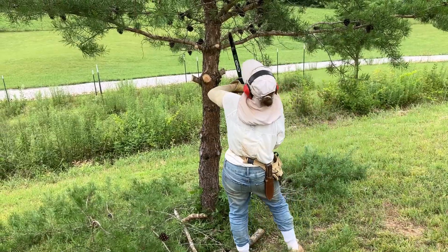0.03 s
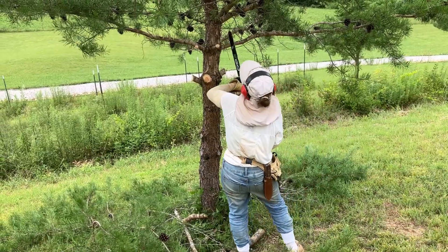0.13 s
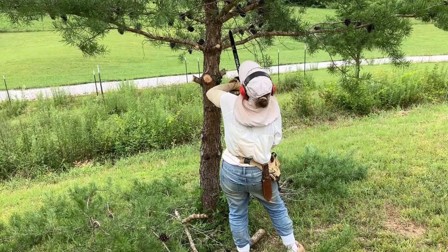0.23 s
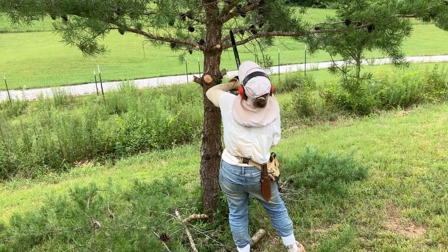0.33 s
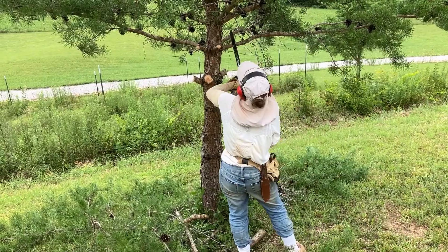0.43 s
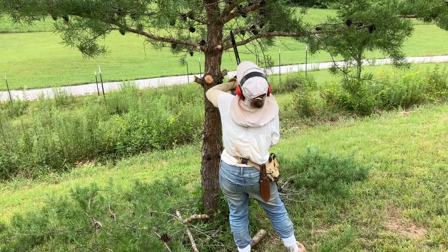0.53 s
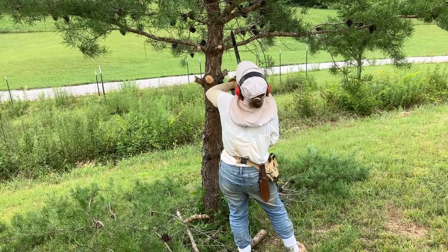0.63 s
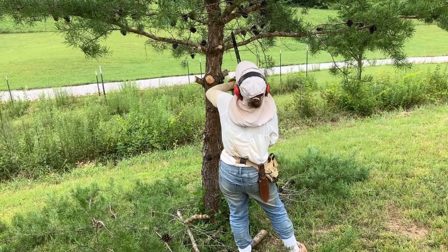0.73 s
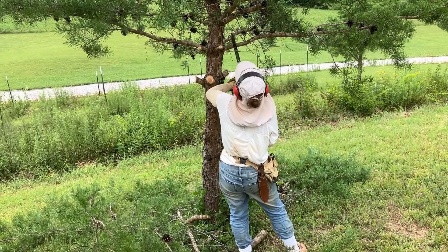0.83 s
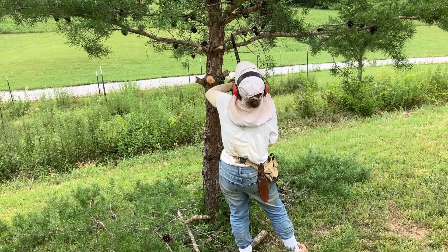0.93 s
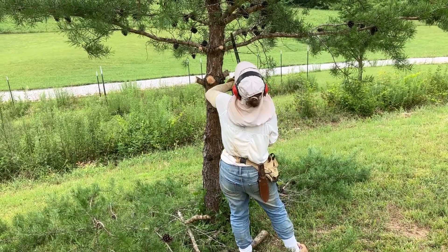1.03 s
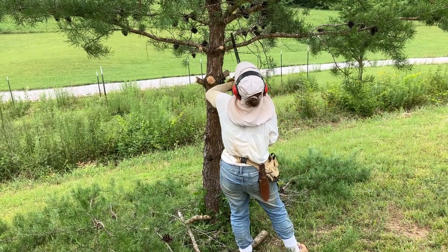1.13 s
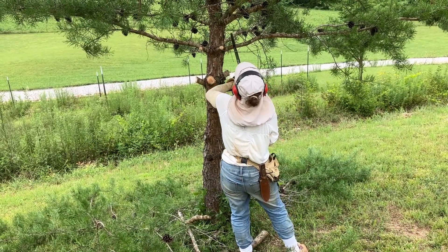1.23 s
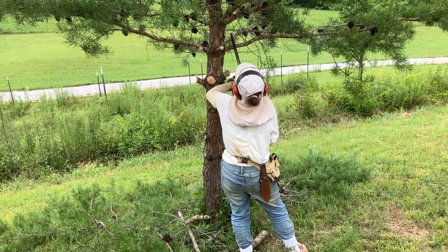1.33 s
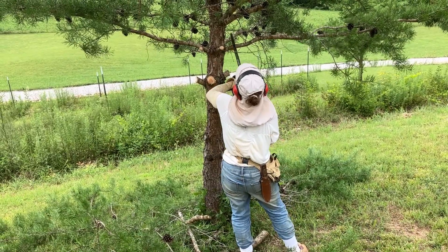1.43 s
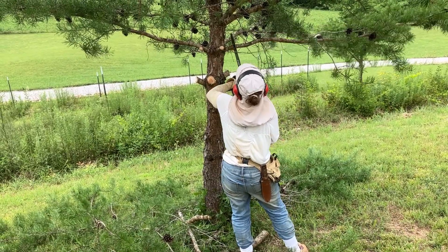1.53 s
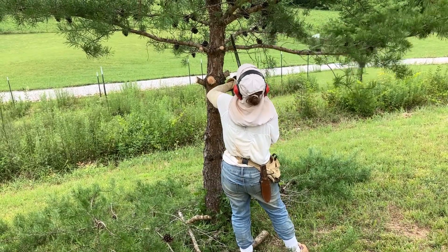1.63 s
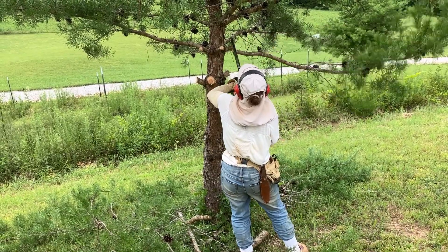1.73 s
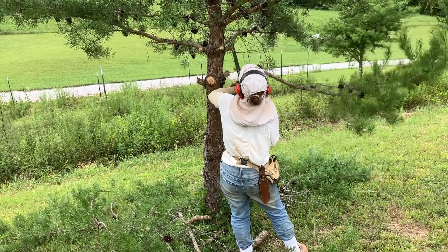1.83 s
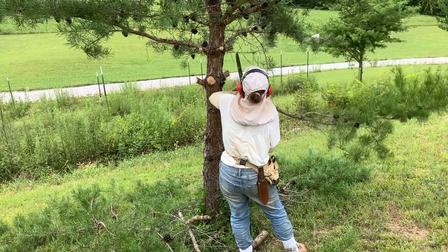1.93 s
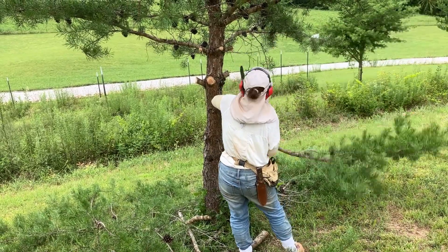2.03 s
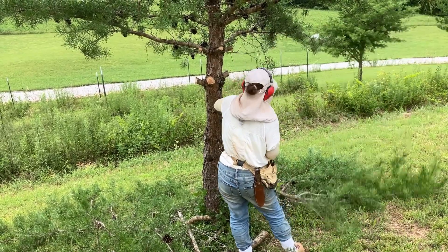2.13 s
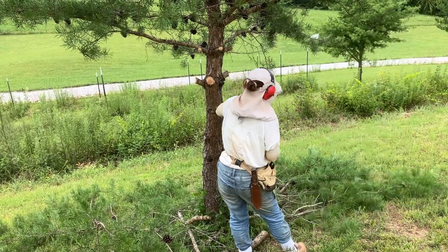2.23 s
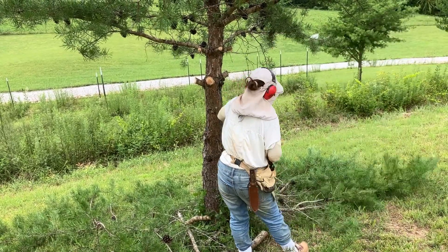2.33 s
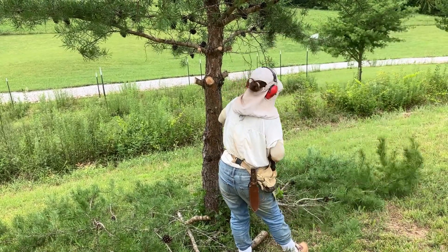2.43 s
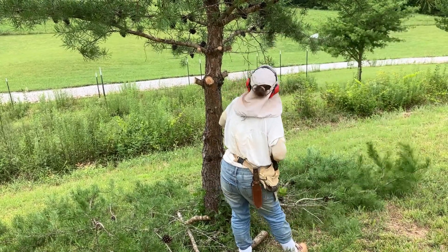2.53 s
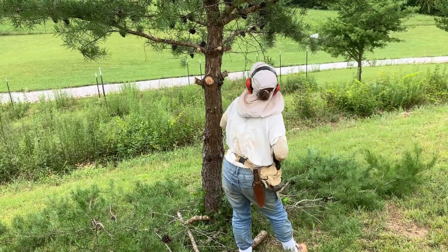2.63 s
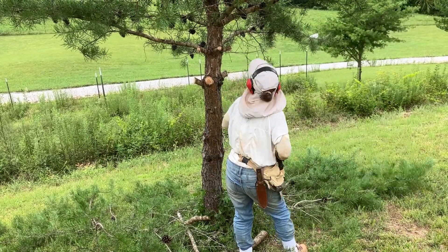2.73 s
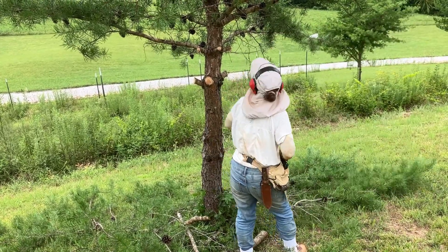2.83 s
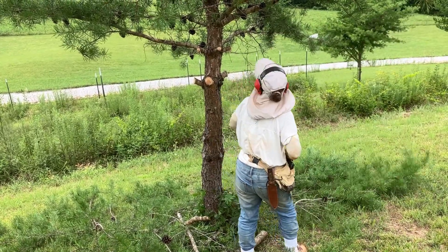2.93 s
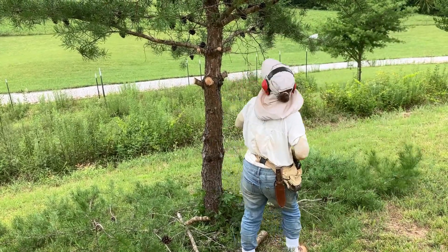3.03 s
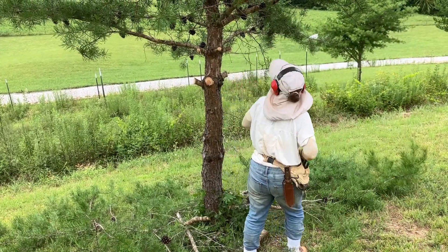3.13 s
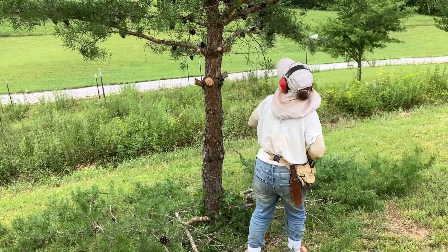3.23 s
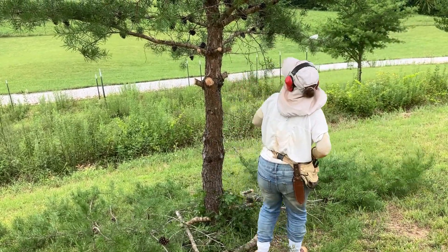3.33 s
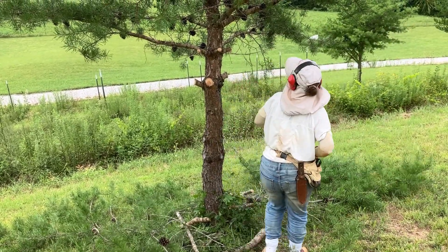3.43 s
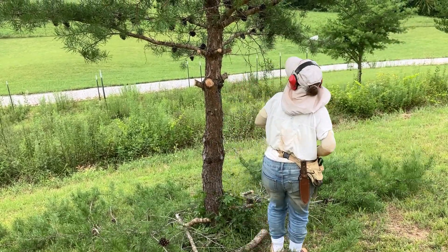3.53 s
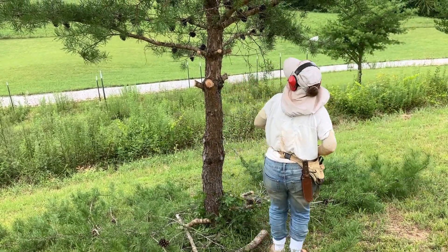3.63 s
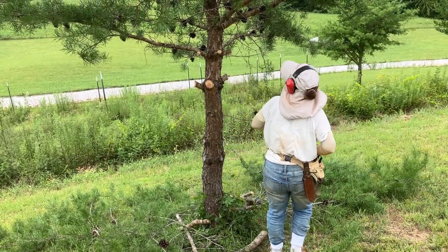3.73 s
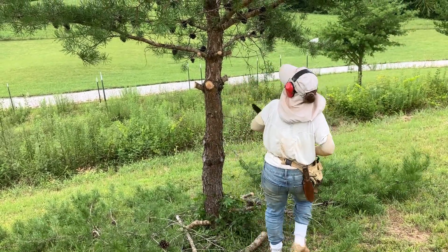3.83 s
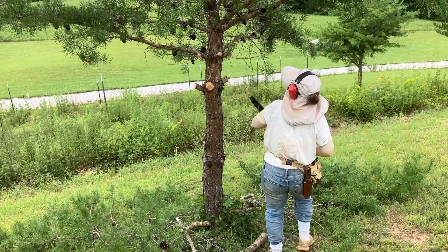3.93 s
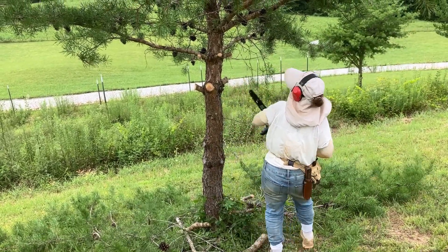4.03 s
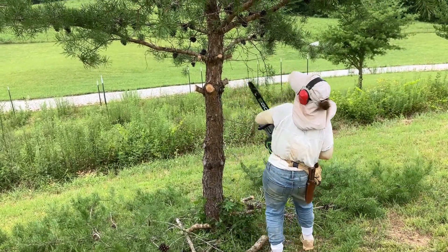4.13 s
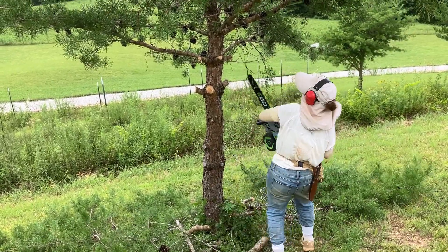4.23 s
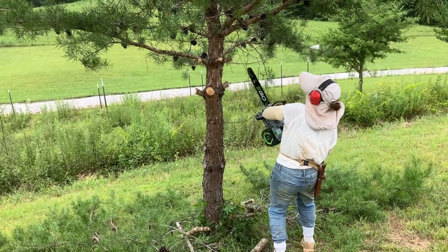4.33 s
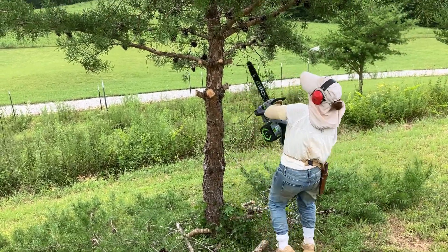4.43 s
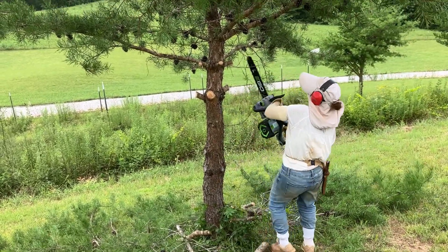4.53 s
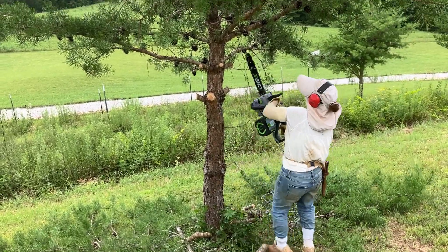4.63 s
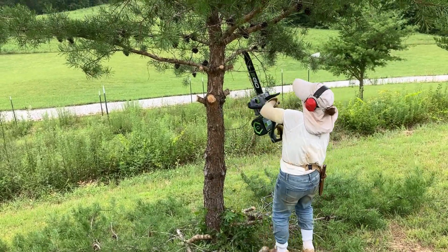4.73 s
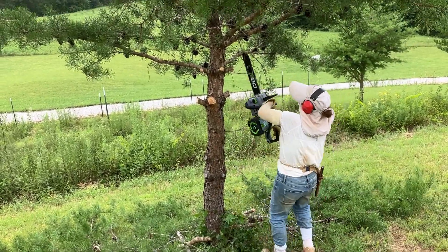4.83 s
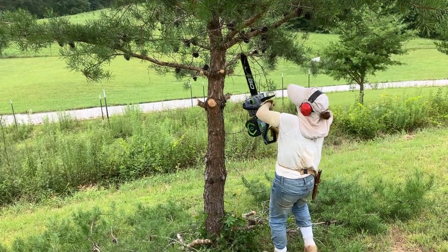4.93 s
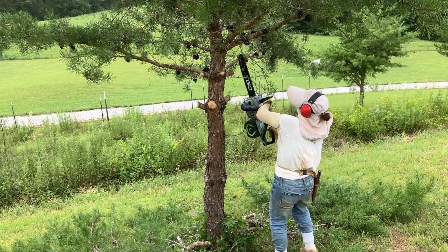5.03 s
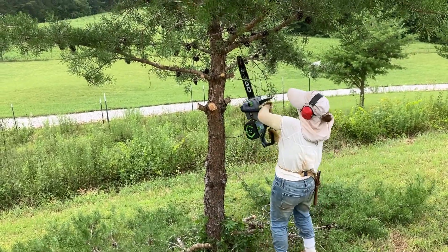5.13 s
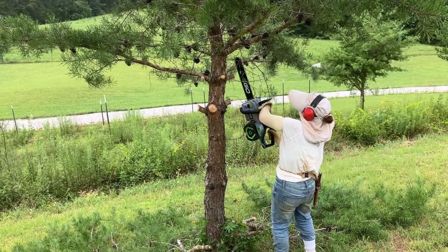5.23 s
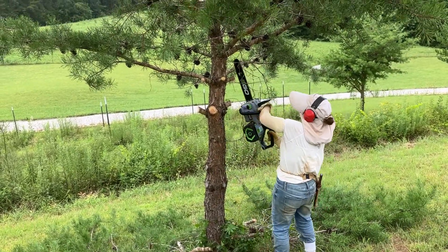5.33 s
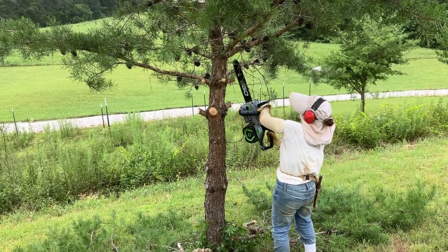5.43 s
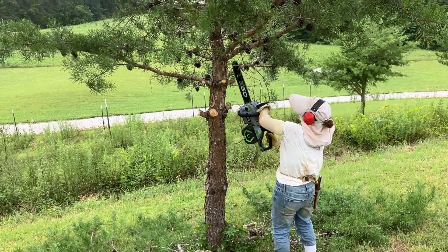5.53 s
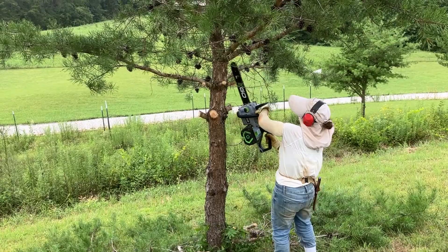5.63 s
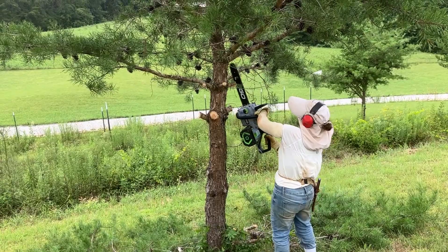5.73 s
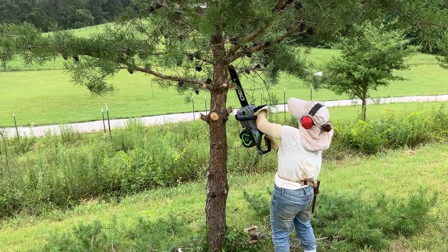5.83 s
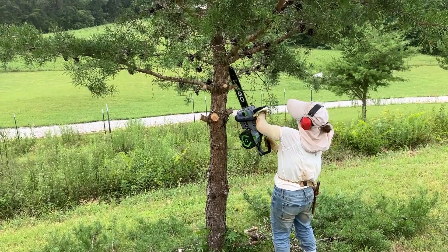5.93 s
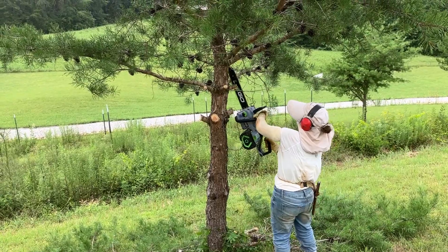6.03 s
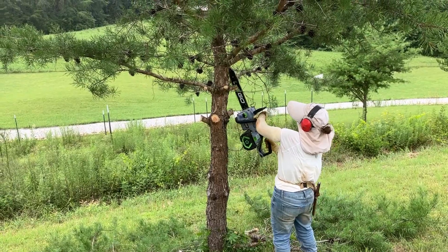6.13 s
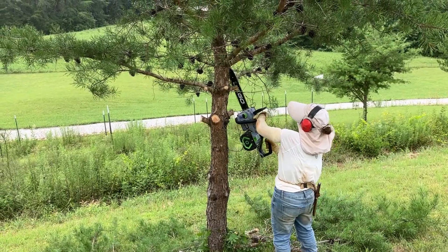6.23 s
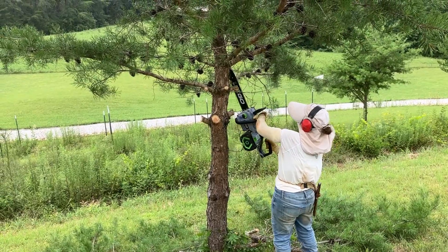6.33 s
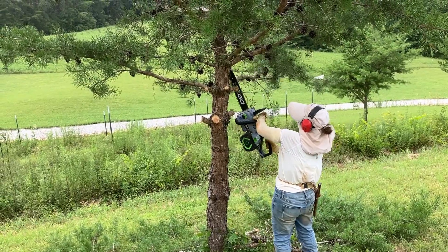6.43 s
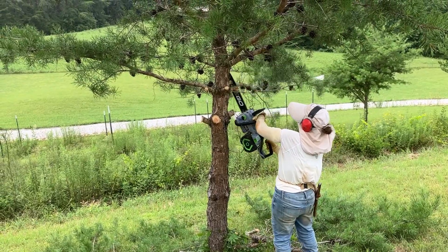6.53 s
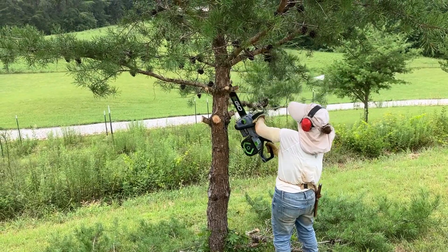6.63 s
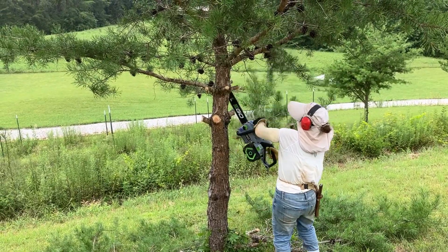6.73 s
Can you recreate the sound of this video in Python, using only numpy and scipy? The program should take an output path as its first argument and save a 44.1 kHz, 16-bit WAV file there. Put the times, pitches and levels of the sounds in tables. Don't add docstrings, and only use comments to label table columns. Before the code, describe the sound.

Outdoors, an electric chainsaw buzzes and rattles, wood splits, the branch drops with a swish and thump, and the saw revs into another cut.

```python
import sys
import numpy as np
from scipy import signal
from scipy.fft import rfft, irfft, next_fast_len
from scipy.io import wavfile
from scipy.ndimage import uniform_filter1d

SR = 44100
rng = np.random.default_rng(int(sys.argv[2]) if len(sys.argv) > 2 else 0)


def inscribe(sig):
    pcm = np.round(np.clip(np.atleast_2d(sig).T, -1, 1) * 32767)
    wavfile.write(sys.argv[1], SR, pcm.astype(np.int16))


def linear_from_db(decibels):
    return 10 ** (np.asarray(decibels, float) / 20)


N = 298998

# frequency in Hz, level in dB per Hz.
GUST = [(22, -29.5), (45, -1.5), (75, 0), (110, -3), (180, -12.5), (350, -32), (700, -47)]
# peak in seconds, length in seconds, level in dB.
PUFFS = [(0.022, .03, -59), (.2, 0.054, -54), (.31, .05, -51), (.5, 0.046, -50), (0.721, .04, -54),
         (.84, 0.063, -52), (0.964, 0.029, -53), (1.13, 0.11, -50), (1.71, 0.042, -53), (1.885, 0.09, -48),
         (2.048, 0.076, -56), (2.171, 0.044, -56), (2.268, 0.036, -52), (2.387, 0.075, -50),
         (2.523, 0.053, -35.5), (2.64, 0.059, -48), (2.72, 0.075, -49), (2.873, 0.056, -50.5),
         (3.08, 0.1, -58.5), (3.384, 0.068, -51), (3.47, 0.06, -47), (3.59, 0.087, -58),
         (3.981, 0.058, -52.5), (4.178, 0.044, -58), (4.42, .05, -64), (4.731, 0.043, -53),
         (4.93, 0.075, -54), (5.318, .03, -60), (5.571, 0.052, -48), (5.66, 0.049, -56), (5.84, 0.038, -49),
         (5.981, 0.062, -47), (6.08, 0.029, -58), (6.444, .04, -61), (6.6, .05, -48), (6.751, 0.051, -45)]
# frequency in Hz, level in dB per Hz.
AIR = [(150, -4.5), (290, 5), (450, -7.5), (700, -2.5), (950, -12), (1400, -25), (3000, -40.5), (7700, -23),
       (8350, -9), (9000, -22.5), (15500, -26)]

# frequency in Hz, level in dB per Hz.
NEEDLES = [(400, 1), (700, -7), (1500, -4), (2500, -1.5), (6500, 3.5), (8300, 6.5), (15500, -0.5)]
# peak in seconds, length in
# seconds, bright part in dB, low part over it in dB.
BRUSHES = [(2.238, 0.017, -47, -11), (2.275, 0.034, -37.5, -13), (2.323, 0.039, -45, -5),
           (2.37, 0.037, -56.5, -3), (2.449, 0.079, -70, -11), (2.601, 0.063, -65, -4),
           (2.785, 0.14, -66.5, -24), (3.007, 0.068, -75.5, -10), (3.283, 0.076, -64.5, -3),
           (3.412, 0.067, -62.5, -12), (3.54, 0.042, -66, 2), (3.64, 0.025, -66, .3),
           (3.844, 0.081, -65.5, -4), (4.052, 0.065, -95, -0.5), (4.222, 0.069, -75, 8),
           (4.328, 0.037, -89, 9), (4.471, 0.13, -70.5, 1.5), (4.709, 0.013, -57, 9), (4.74, .015, -44, -4)]
# start in seconds, peak in dB, pitch in Hz, length in seconds.
KNOCKS = [(2.274, -46, 138, 0.0098), (2.417, -42, 50, .012), (2.495, -27, 126, 0.0025),
          (2.505, -30, 54.8, 0.013), (2.526, -22.5, 66.3, 0.0036), (2.856, -44, 54.8, .01),
          (2.878, -35, 141.5, 0.0044), (3.042, -49, 79, 0.0077), (3.463, -34, 88, 0.0027),
          (3.568, -48, 87, 0.0049), (3.972, -48, 90.6, 0.0075), (4.411, -56.5, 78.5, .01)]
# start
# in seconds, peak in dB, ring in Hz, bright part # over it in dB.
SNAPS = [(1.095, -20, 900, -2), (1.4093, -18, 1102, 1), (1.5245, -20, 1300, 2), (1.603, -19, 1505, 5),
         (1.69, -17, 620, -8), (2.237, -52, 903, 9.5), (4.7015, -55, 1600, -3), (2.267, -44, 640, 6),
         (2.27, -35, 600, 4), (2.275, -35, 800, 4), (2.281, -47, 700, 8), (2.339, -41, 710, -8),
         (2.384, -57, 635, -12), (2.591, -34.5, 480, -40), (2.714, -58, 1910, -6), (2.822, -64, 3000, 17),
         (2.894, -50, 672, -15), (2.967, -59.5, 606, -2), (3.251, -60, 740, -14.5),
         (3.269, -61.5, 700, -17.5), (3.332, -42, 1030, 4), (3.409, -53, 1490, -14), (3.521, -48, 566, -3),
         (3.535, -51, 1800, 6), (3.567, -53.5, 452, 13), (3.5745, -55, 2500, 9), (3.624, -66, 640, 16),
         (3.6365, -44.5, 1100, 13), (3.82, -61, 657, -10), (3.999, -53, 696, -11.5),
         (4.185, -48.5, 1480, -6), (4.226, -61, 2500, 17), (4.329, -51, 1150, -14), (4.388, -58, 610, -18),
         (4.467, -48.5, 1200, 10), (4.536, -52, 1200, -10), (4.54, -48, 1900, -6)]

# peak in seconds, hold in seconds, level in dB, low Hz, high Hz.
SPLIT = (1.605, .185, -35.5, 3350, 4350)
# peak in seconds, hold in seconds, level in dB, low Hz, high Hz.
SING = (6.23, .38, -38, 11480, 11800)

# seconds after the pull, teeth per second.
RUN_UP = [(0, 60), (.09, 252), (.19, 427), (.24, 585), (.3, 703), (.45, 1050)]
# seconds after release, share of speed left (0-1).
BRAKE = [(0, 1), (.05, .93), (.085, .875), (.1, .78), (.12, .63), (.14, .51), (.17, .41), (.23, .27)]
# time in seconds, teeth per second.
SPEED_FIRST = [(0, 645), (.3, 651), (.55, 652), (1.05, 656), (1.36, 656), (1.62, 665), (1.82, 687),
               (1.9, 696), (2.0, 692)]
SPEED_SECOND = [(5.05, 792), (5.15, 793.4), (5.72, 793.8), (5.86, 811), (5.95, 819), (6.03, 823),
                (6.18, 834), (6.3, 828), (6.43, 839), (6.6, 852), (6.66, 862), (6.78, 866)]
# peak in seconds, build-up in seconds, strength (0-1), speed sag in Hz.
BITES_FIRST = [(.1, .04, 0.16, -1), (.2, 0.061, 0.2, 0.5), (.8, 0.093, 0.08, 0), (1.11, 0.027, 0.55, 15.5),
               (1.23, 0.058, 0.52, 5), (1.335, 0.046, 0.7, 9), (1.415, 0.015, 0.82, -0.5),
               (1.535, 0.052, 0.76, 9), (1.61, 0.035, 0.73, 0.5), (1.7, 0.048, 0.91, 23.5),
               (1.77, 0.034, 0.35, 1.5), (1.95, 0.13, 0.19, 0), (2.15, .03, 0.38, 0.5)]
BITES_SECOND = [(4.8, 0.061, 0.51, 0), (4.95, 0.038, 0.29, 1), (5.75, 0.062, 0.15, 0),
                (6.121, 0.0695, 0.39, 16.5), (6.39, 0.087, 0.26, 7), (6.596, .1, 0.43, 19),
                (6.78, 0.76, 0.22, 0)]
# level in dB, dB per octave of speed, dB at full bite, drift in dB per second.
LAYERS_FIRST = [
    (-25, 7.5, 1.5, 0.5),
    (-32.5, 4.5, 0.5, 0),
    (-36, -1.5, 7.5, 0.74),
    (-33.5, 18.5, -2.5, -1.35),
    (-4, 3.5, 0.8, 4),
    (-0.55, 9.5, -2, -2.5),
    (-9, 2.5, 4, 3.5),
    (-8, 2.2, -7, -2.9),
]
LAYERS_SECOND = [(-24, 9.4, -1, -0.13), (-31.5, 7.9, -0.5, 0.28), (-35, 3, 2, -0.43), (-36, 20, 5, 0.2),
                 (0.18, 7.2, -2.5, -1), (-3.5, 6.7, 4, -3.5), (-9.5, 7.7, 4.5, 0), (-14.5, 3.9, -4, 1.7)]
# frequency in Hz, width in Hz, level in dB.
HOUSING_FIRST = [(350, 130, -29), (554, 50, -30.5), (710, 48.3, -29), (832, 33, -23), (995, 32, -29),
                 (1282, 50, -27), (1384, 67, -29), (1705, 100, -32.5), (2103, 44, -26), (2547, 90, -33.5)]
HOUSING_SECOND = [(320, 71, -33.5), (566, 100, -35.5), (706, 58, -29.5), (802.6, 118, -20), (1039, 26, -36),
                  (1260, 68, -29.5), (1420, 95, -22), (1676, 36, -23), (2583, 43.03, -25),
                  (3172, 47, -26.5), (3458, 40, -20)]
# multiple of shaft speed, level in dB, dB per % of climb off the housing resonance.
ORDERS_FIRST = [(1, -30, 0), (2, -22, 2), (3, -7.5, 0), (4, -10, 0), (5, -5.5, 0), (7, -8, 0),
                (8, -14.5, 0), (9, -15, 0), (10, -13, 0), (11, -8.5, 0), (13, -14, 0), (15, -10, 0),
                (16, -18, 0), (17, -12, 0), (23, -15, 0), (30, -14, 0), (36, -18, 0), (37, -17, 0),
                (48, -16, 0), (51, -16, 0), (72, -9, 0), (97, -9, 0)]
ORDERS_SECOND = [(1, -30, .6), (2, -15, .8), (3, -15.5, -.5), (4, -6, 0), (5, -2, .3), (7, -4, -.6),
                 (8, -12, .2), (9, -9, 0), (10, -0.8, -1.5), (11, .5, -1), (13, -21, 2.4), (14, -15, -1),
                 (20, -11, 0), (23, -12, .3), (30, -15, 2.2), (34, -16, 0), (37, -2.5, -2.5), (39, -11, .4),
                 (42, -7, .6), (48, -19, 1.8), (56, -10, -.5), (60, -3, -2), (88, -12, .6), (90, -10, -.4)]
# frequency in Hz, level in dB per Hz.
CHAIN_FIRST = [(150, -24.5), (230, -12.5), (330, -5.5), (600, -0.5), (800, -7), (1300, -4.5), (1800, -8.5),
               (2500, -11.5), (3500, -13.5), (5000, -12), (6800, -4), (8300, 2), (11000, 6), (15500, 0.5)]
CHAIN_SECOND = [(150, -38), (230, -25), (330, -14), (600, -10.5), (800, -4), (1300, -6), (1800, -11),
                (2500, -8), (3500, -8), (5000, -8.5), (6800, -12.5), (8300, -8.5), (11000, -9),
                (15500, -10.5)]
# frequency in Hz, width in Hz, level in dB.
DIPS_FIRST = [(160, 60, -14), (432, 52, -21), (1050, 35, -7), (1520, 70, -16), (2090, 90, -14),
              (2780, 70, -13), (3200, 40, -8), (4700, 70, -10), (5600, 60, -7), (6250, 80, -8),
              (3760, 90, -15), (4310, 70, -18), (6700, 420, -10), (8450, 450, 4)]
DIPS_SECOND = [(170, 60, -14), (480, 40, -10), (940, 45, -9), (1100, 35, -8), (1410, 50, -7),
               (1535, 35, -11), (1670, 30, -11), (1790, 30, -4), (2160, 100, -16), (2860, 80, -13),
               (3400, 90, -15), (3800, 80, -18), (4350, 70, -13), (4770, 60, -12), (7000, 300, -5)]
# frequency in Hz, level in dB per Hz.
WOOD = [(60, -49.5), (150, -16.5), (250, -6), (600, -7.5), (1300, -2.5), (3000, -8), (6000, -10.5),
        (12000, -10.5)]
# dB in the run-up, dB under the brake.
STRAIN = [(0.1, -0.5), (-0.3, 7.5), (2.5, 0.5), (-0.8, -4)]
# seconds after the pull, low part in dB, bright part in dB.
JOLTS = [
    (.019, -33, -47.5),
    (.026, -33, -40.5),
    (.066, -35.5, -45.5),
    (0.093, -37, -47),
]
# peak in seconds, build-up in seconds, dB.
SURGES = [
    (.28, 0.022, 6),
    (1.15, 0.013, 3),
    (1.415, .015, 1.5),
    (1.53, .02, 1.5),
    (1.7, .02, 3.5),
    (6.06, .03, 1.5),
    (6.585, .035, 3.5),
    (6.77, .03, 3.5),
]
# time in seconds, left over right in dB.
BEARING = [(0, 0), (2.2, -0.3), (4.7, -0.1), (6.0, 0.5), (6.78, 1.2)]

# frequency in Hz, likeness (0-1).
SAME = [(60, 0.52), (300, 0.7), (1400, 0.84), (2600, 0.4), (6200, 0.78), (9150, 0.93), (11300, .85),
        (13600, 0.91)]
# frequency in Hz, lead of the left port in radians.
LEAD = [(250, 0), (750, .42), (1400, .1), (2100, .2), (2800, 1.4), (3300, .9), (4700, 1.9), (6200, 2.1),
        (6800, 0), (9150, -3.14), (11350, -6.28), (13600, -9.42), (15700, -12.5)]
# frequency in Hz, left over right in dB.
TILT = [(100, .1), (300, -.2), (650, .8), (820, 2.2), (1300, 3.2), (2500, 1.3), (5000, -.1)]

LET_GO_S = .03


def evened(x):
    return x / np.sqrt(np.mean(x ** 2) + 1e-20)


def read(points, hz):
    f, value = np.transpose(points)
    return np.interp(np.log(hz + 1), np.log(f + 1), value)


def coloured(x, points):
    size = next_fast_len(x.shape[-1])
    gain = linear_from_db(read(points, np.fft.rfftfreq(size, 1 / SR)))
    return evened(irfft(rfft(x, size) * gain, size)[..., :x.shape[-1]])


def band(x, lo_hz, hi_hz):
    return signal.sosfilt(signal.butter(3, [lo_hz, hi_hz], "band", fs=SR, output="sos"), x)


def wander(n, rate_hz):
    low_pass = signal.butter(2, rate_hz, fs=SR / 16)
    coarse = signal.lfilter(*low_pass, rng.standard_normal(n // 16 + 2))
    return np.interp(np.arange(n) / 16, np.arange(len(coarse)), evened(coarse))


def swell(t, s, rise, fall):
    return np.exp(-(np.maximum(s - t, 0) / rise) ** 2 - np.maximum(t - s, 0) / fall)


def ports(x):
    size = next_fast_len(x.shape[1])
    same = np.clip(read(SAME, np.fft.rfftfreq(size, 1 / SR)), 0, 1)
    a, b = rfft(x, size)
    second = same * a + np.sqrt(1 - same ** 2) * b
    return irfft(np.array([a, second]), size)[:, :x.shape[1]]


def add(mix, s, sound):
    part = mix[..., round(s * SR):][..., :sound.shape[-1]]
    part += sound[..., :part.shape[-1]]


def meadow():
    calm_db, puff_rise, air_db = -71, 0.91, -66
    n = next_fast_len(N)
    t = np.arange(0, n + 64, 64) / SR
    level = linear_from_db(calm_db)
    for s, length, db in PUFFS:
        width = np.where(t < s, puff_rise * length, length)
        level = level + linear_from_db(db) * np.exp(-((t - s) / width) ** 2)
    level = np.interp(np.arange(n) / SR, t, level)
    lumps = rng.standard_normal((2, n)) * linear_from_db(3.0 * wander(n, 12))
    wind = level * linear_from_db(-3.5) * coloured(lumps, GUST)
    hush = coloured(rng.standard_normal((2, n)), AIR) * linear_from_db(1.8 * wander(n, 7))
    return ports(wind + linear_from_db(air_db) * hush)[:, :N]


def trees(x):
    level_db, t60_s, delay_s = -46, 2.0, .28
    t = np.arange(2 * SR) / SR
    tail = band(rng.standard_normal((2, len(t))), 530, 1450) * linear_from_db(-60 * t / t60_s) * (t > delay_s)
    return linear_from_db(level_db) * signal.fftconvolve(x, tail / np.linalg.norm(tail[0]), axes=1)[:, :N]


def rustle():
    start, n = 2.2, int(2.6 * SR)
    floor_db, rise = -78.5, 0.58
    t = start + np.arange(n) / SR
    bright, low = linear_from_db(floor_db), linear_from_db(floor_db + 2.0)
    for s, length, db, low_db in BRUSHES:
        stroke = swell(t, s, rise * length, length)
        bright = bright + linear_from_db(db) * stroke
        low = low + linear_from_db(db + low_db) * stroke
    grains = rng.standard_normal((2, n)) * linear_from_db(2.8 * wander(n, 400) + 2.0 * wander(n, 30))
    grains = coloured(grains, NEEDLES)
    crisp = bright * evened(band(grains, 2400, 17000))
    body = low * linear_from_db(-3) * evened(band(grains, 400, 2400))
    return start, ports(crisp + body)


def knock(s, db, hz, length):
    t = np.arange(5000) / SR
    u = t / max(length, .003)
    push = np.e * u * np.exp(-u)
    return s, linear_from_db(db) * push * np.sin(2 * np.pi * hz * t * (1 + .7 * np.exp(-u / 2)))


def snap(s, db, hz, bright_db):
    t = np.arange(1500) / SR
    tick = band((rng.standard_normal(len(t)) + 2 * (t == 0)) * np.exp(-t / .0008), 2200, 16500)
    crack = band(rng.standard_normal(len(t)) * np.exp(-t / .002), .8 * hz, 6000)
    ring = band(np.sin(2 * np.pi * hz * t) * np.exp(-t / .002), .4 * hz, 4 * hz)
    tick = linear_from_db(bright_db) * tick / abs(tick).max()
    crack = 0.36 * linear_from_db(bright_db / 2) * crack / abs(crack).max()
    return s, linear_from_db(db) * (0.75 * ring + crack + tick)


def squeal(s, hold, db, lo_hz, hi_hz):
    t = np.arange(SR // 2) / SR
    shape = swell(t, .03, .015, 3.0) * swell(t, .03 + hold, 9.0, .02)
    rough = rng.standard_normal((2, len(t))) * linear_from_db(1.5 * wander(len(t), 150))
    return s - .03, ports(linear_from_db(db) * shape * evened(band(rough, lo_hz, hi_hz)))


def dipped(x, dips, shaded, combed):
    sway_share, sway_hz = .012, .9
    twigs_db, twigs_from_hz = 2.6, 1800
    hz, t, z = signal.stft(x, SR, nperseg=2048, noverlap=1536)
    hz = hz[:, None]
    sway = sum(np.sin(2 * np.pi * (k * sway_hz * t + rng.random((len(dips), 1)))) / k for k in (.4, 1, 2.3))
    cancel = 0
    for (f, w, db), s in zip(dips, sway):
        centre = f * (1 + sway_share * s * (f > twigs_from_hz) / 2)
        cancel = cancel + db * np.exp(-((hz - centre) / w) ** 2)
    streaks = uniform_filter1d(rng.standard_normal(cancel.shape), size=3, axis=0)
    streaks = evened(uniform_filter1d(streaks, size=22, axis=1))
    streaks *= twigs_db * np.clip(hz / twigs_from_hz - 1, 0, 1)
    low = hz < twigs_from_hz
    gain_db = np.multiply.outer(shaded, cancel * low) + cancel * ~low + np.multiply.outer(combed, streaks)
    return signal.istft(z * linear_from_db(gain_db), SR, nperseg=2048, noverlap=1536)[1][:, :x.shape[1]]


def sprocket_speed(t, pull, release, pace, governed):
    run_up = np.interp((t - pull) * pace, *np.transpose(RUN_UP))
    driven = (run_up ** -20. + governed ** -20.) ** (-1 / 20)
    return driven * np.interp(t - release, *np.transpose(BRAKE))


def housing_ring(line_hz, housing, dips, lag):
    ring = sum(linear_from_db(db) / (1 + ((line_hz - f) / w) ** 2) ** 1.316 for f, w, db in housing)
    dip_db = sum(db * np.exp(-((line_hz - f) / w) ** 2) for f, w, db in dips)
    return ring * linear_from_db((1 - .55 * lag) * dip_db)


def tooth_whine(t, hz, teeth, lines_db, load, lag, release, housing, dips):
    coast_db, coast_s = -3.5, .05
    stutter_db = 2.4
    surge_db = sum(db * swell(t, s, rise, LET_GO_S) for s, rise, db in SURGES)
    coast = coast_db * np.clip((t - release) / coast_s, 0, 1)
    shake = -0.69 + 1.84 * load + stutter_db * lag * (t < release)
    whine = 0
    for k, (db, (up_db, down_db)) in enumerate(zip(lines_db, STRAIN), 1):
        if k == 1:
            db = db + coast + surge_db
        db = db + lag * np.where(t < release, up_db, down_db) + shake * wander(len(t), 55)
        whine = whine + housing_ring(k * hz, housing, dips, lag) * linear_from_db(db) * np.sin(k * teeth)
    return whine


def shaft_orders(teeth, orders, climb, load, lag):
    sprocket_teeth = 6
    n = len(teeth)
    shaft = 0
    for k, db, slip in orders:
        flutter_db = (.8 + 1.5 * load) * wander(n, 20) + 5 / k ** 2 * wander(n, 9)
        fade_db = -.25 * min(k, 24) * (load + lag)
        jitter = (.12 + 1.0 * load) * min(k / 4, 1) * wander(n, 30)
        phase = round(k) * teeth / sprocket_teeth + k ** 2 + jitter
        shaft = shaft + linear_from_db(db + flutter_db + slip * climb + fade_db) * np.sin(phase)
    return shaft


def chain_links(teeth, throb, chain):
    n = len(teeth)
    gate = 1 + throb * np.cos(teeth) + 0.31 * throb * np.cos(2 * teeth)
    gate = gate * linear_from_db(0.59 * wander(n, 150))
    return coloured(gate * rng.standard_normal((2, n)), chain)


def wood_chips(hz):
    n = len(hz)
    clicks = (rng.random((2, n)) < 1.6 * hz / SR) * rng.choice([-1., 1.], (2, n))
    clicks = clicks * linear_from_db(0.66 * np.minimum(rng.exponential(1, (2, n)), 3))
    return coloured(clicks * linear_from_db(1.3 * wander(n, 45)), WOOD)


def saw(pull, release, pace, speed, bites, layers, housing, orders, chain, throb, dips):
    engage_db, engage_s = -12, 0.056
    brake_db, brake_s, brake_curve = -38.5, 0.23, 4.06
    knee_hz = 610
    bite_floor, bite_db = 0.05, -24
    start = max(pull, 0)
    t = np.arange(start, min(release + BRAKE[-1][0], N / SR), 1 / SR)
    n = len(t)

    dig = np.array([swell(t, s, rise, LET_GO_S) for s, rise, _, _ in bites])
    cut, sag_hz = np.array(bites)[:, 2:].T @ dig
    governed = np.interp(t, *np.transpose(speed)) - sag_hz
    hz = sprocket_speed(t, pull, release, pace, governed)
    lag = np.clip(3 * (1 - hz / governed), 0, 1)
    climb = np.clip(100 * (governed / speed[1][1] - 1), 0, 5)

    slack_db = engage_db * np.exp((pull - t) / engage_s)
    slack_db = slack_db + brake_db * (np.maximum(t - release, 0) / brake_s) ** brake_curve
    octaves = np.log2(np.minimum(hz / knee_hz, 1))
    rattle_db, bar_db, growl_db, shaft_db, *lines_db = (
        db + fast * octaves + bitten * cut + drift * (t - start) + slack_db
        for db, fast, bitten, drift in layers)
    chips_db = bite_db + 20 * np.log10(abs(cut) + bite_floor) + slack_db
    slap_shapes = np.array([swell(t, pull + s, 0.0029, 0.011) for s, _, _ in JOLTS])
    low_slaps, bright_slaps = linear_from_db(np.array(JOLTS)[:, 1:].T) @ slap_shapes

    load = np.clip(linear_from_db(chips_db - rattle_db + 5.5), 0, 1.5)
    teeth = 2 * np.pi * np.cumsum(hz * (1 + (.0002 + .0034 * load) * wander(n, 14))) / SR
    whine = tooth_whine(t, hz, teeth, lines_db, load, lag, release, housing, dips)
    shaft = linear_from_db(shaft_db - 7 * lag) * shaft_orders(teeth, orders, climb, load, lag)
    dry_parts = np.vstack([chain_links(teeth, throb, chain), wood_chips(hz), shaft])
    heard = dipped(dry_parts, dips, shaded=[1, 1, .15, .15, 1], combed=[1, 1, 1, 1, 0])
    links, chips, shaft = heard[:2], evened(heard[2:4]), heard[4]

    growl = (linear_from_db(growl_db) + low_slaps) * evened(band(links, 200, 1660))
    bar = (linear_from_db(bar_db) + bright_slaps) * evened(band(links, 1700, 5740))
    rattle = linear_from_db(rattle_db) * evened(band(links, 5700, 21000))
    noise = rattle + bar + growl + linear_from_db(chips_db) * chips
    pan = linear_from_db(np.outer([.5, -.5], np.interp(t, *np.transpose(BEARING))))
    sound = np.sqrt(2) * (whine + shaft) * pan + ports(band(noise, 125, 21000))
    fade_in = np.minimum(np.arange(n) / 100 + (start == 0), 1)
    return start, sound * fade_in


def scene():
    mix = np.zeros((2, N))
    add(mix, *saw(pull=-.086, release=2.0, pace=1.05, speed=SPEED_FIRST, bites=BITES_FIRST,
                  layers=LAYERS_FIRST, housing=HOUSING_FIRST, orders=ORDERS_FIRST,
                  chain=CHAIN_FIRST, throb=0.32, dips=DIPS_FIRST))
    add(mix, *saw(pull=4.7, release=9.0, pace=1.001, speed=SPEED_SECOND, bites=BITES_SECOND,
                  layers=LAYERS_SECOND, housing=HOUSING_SECOND, orders=ORDERS_SECOND,
                  chain=CHAIN_SECOND, throb=0.094, dips=DIPS_SECOND))
    add(mix, *squeal(*SPLIT))
    add(mix, *squeal(*SING))
    mix += trees(mix) + meadow()
    add(mix, *rustle())
    for row in SNAPS:
        add(mix, *snap(*row))
    for row in KNOCKS:
        add(mix, *knock(*row))
    return mix


def band_limit(x):
    return signal.sosfilt(signal.butter(12, 17080, fs=SR, output="sos"), x)


def record(dry):
    low_cut_hz, edge_hz = 31, 15690
    size = next_fast_len(N + 2048)
    hz = np.fft.rfftfreq(size, 1 / SR)
    lead = np.interp(hz, *np.transpose(LEAD))
    left = linear_from_db(read(TILT, hz) / 2) * np.exp(.5j * lead)
    low_cut = hz ** 4 / (hz ** 4 + low_cut_hz ** 4)
    high_cut = np.clip((edge_hz - hz) / 150 + .5, 0, 1)
    z = rfft(dry, size) * np.array([left, 1 / left]) * high_cut * low_cut
    return band_limit(irfft(z, size)[:, :N])


dry = scene()
out = record(dry)
inscribe(out)
```